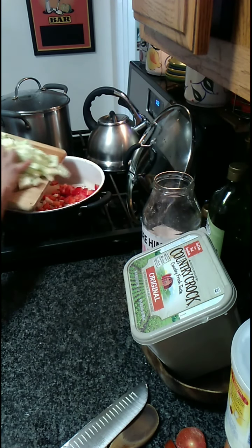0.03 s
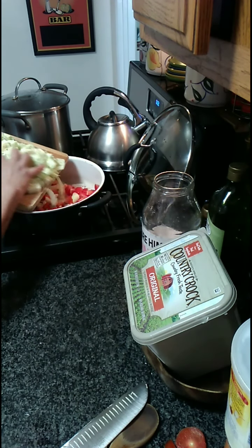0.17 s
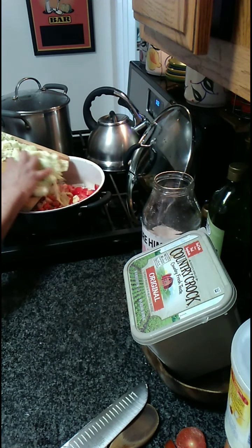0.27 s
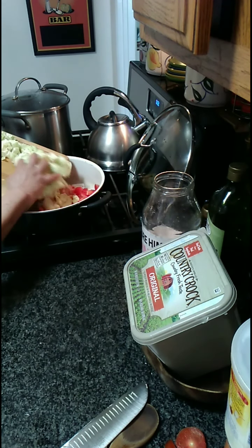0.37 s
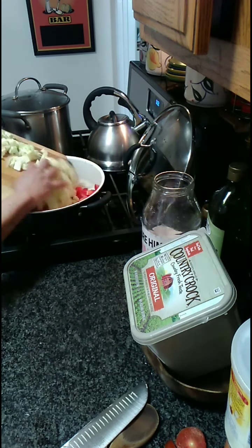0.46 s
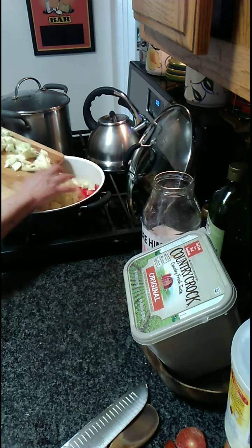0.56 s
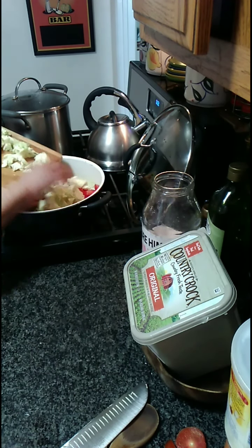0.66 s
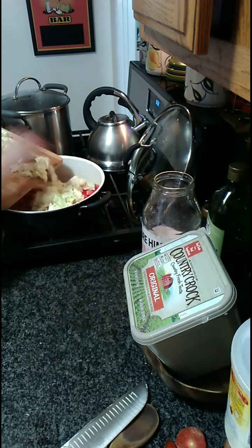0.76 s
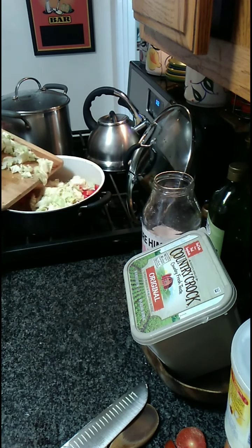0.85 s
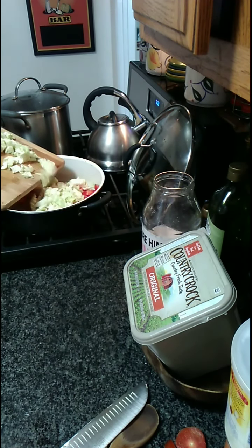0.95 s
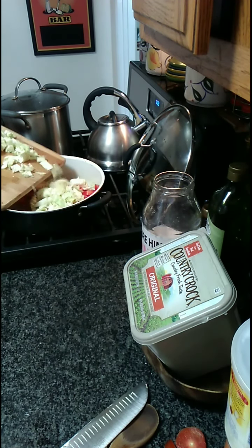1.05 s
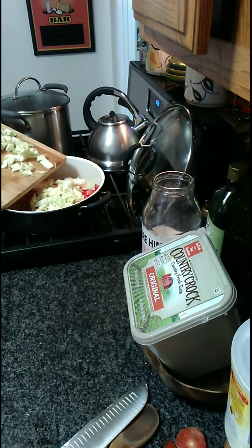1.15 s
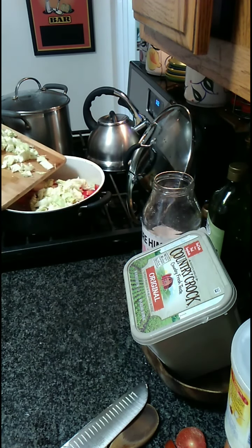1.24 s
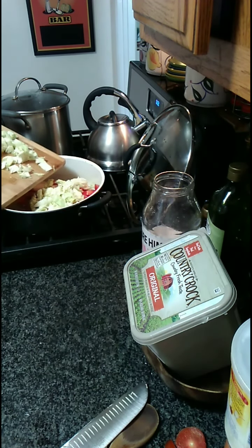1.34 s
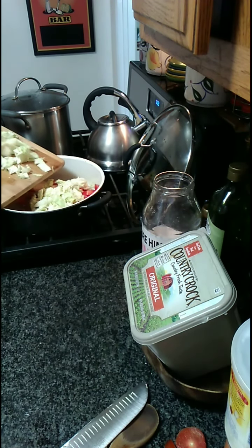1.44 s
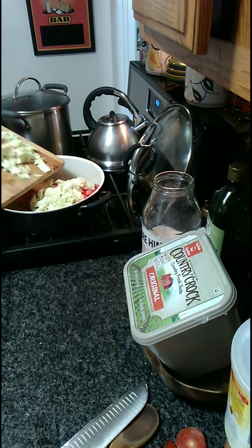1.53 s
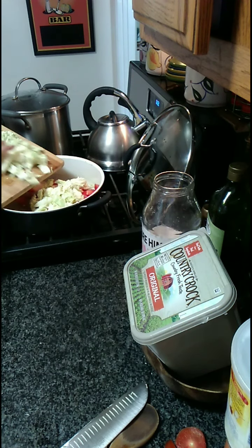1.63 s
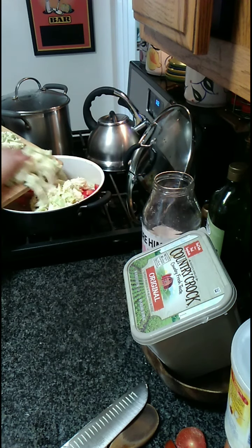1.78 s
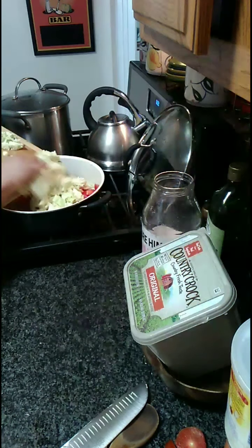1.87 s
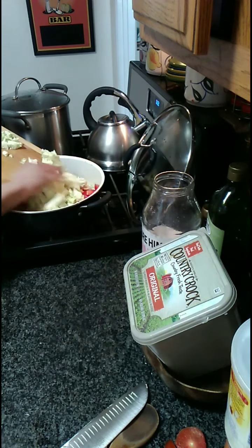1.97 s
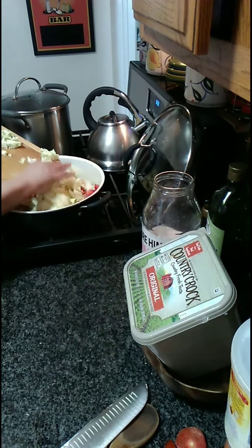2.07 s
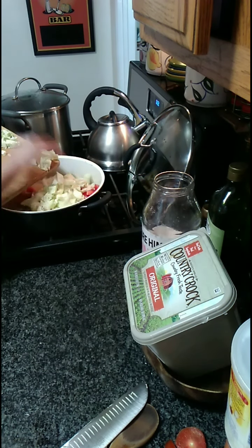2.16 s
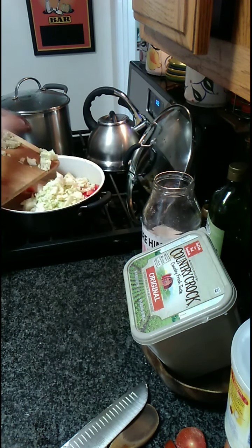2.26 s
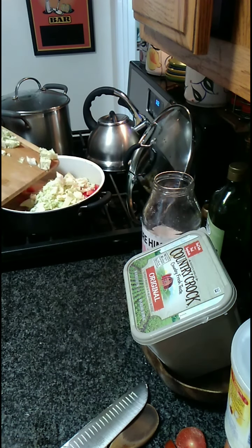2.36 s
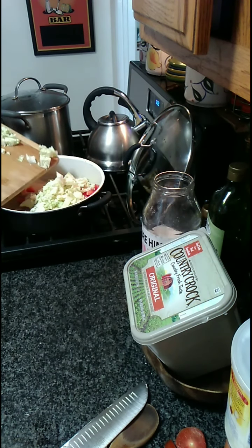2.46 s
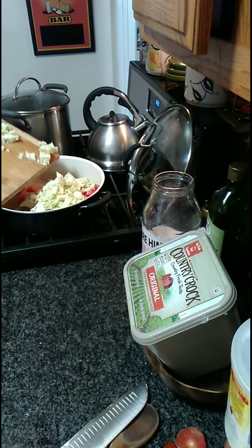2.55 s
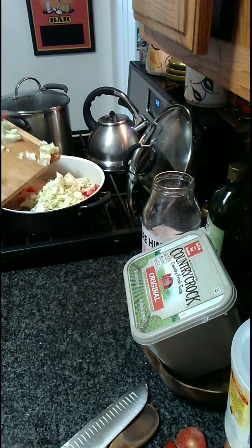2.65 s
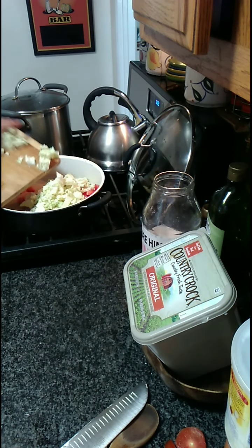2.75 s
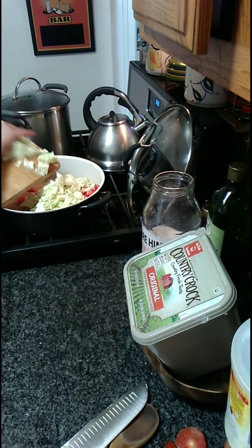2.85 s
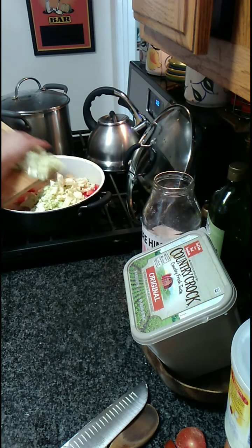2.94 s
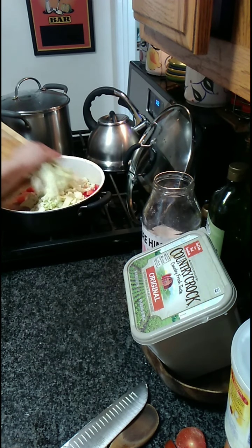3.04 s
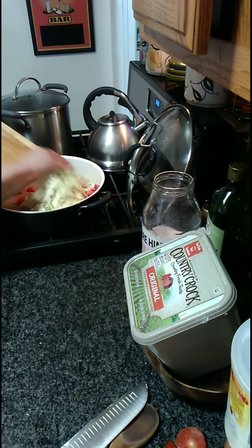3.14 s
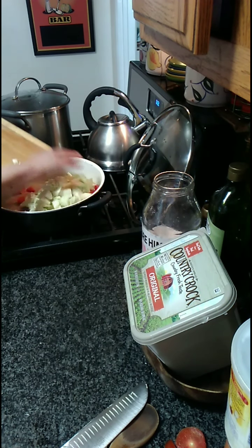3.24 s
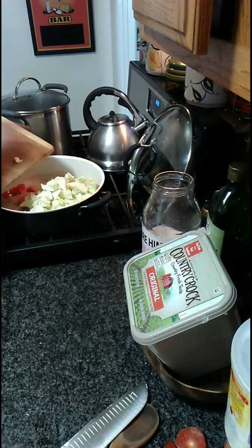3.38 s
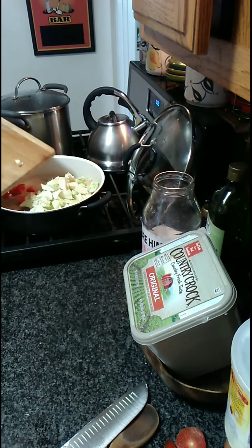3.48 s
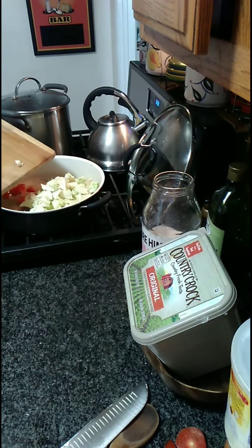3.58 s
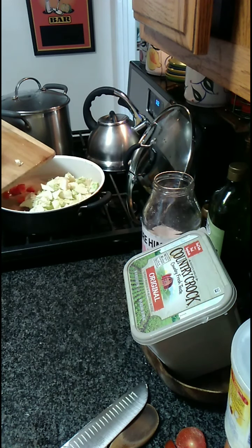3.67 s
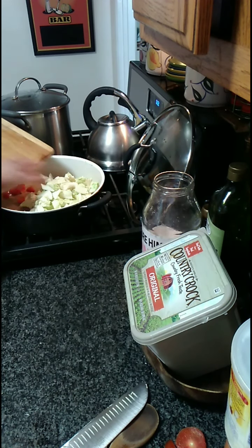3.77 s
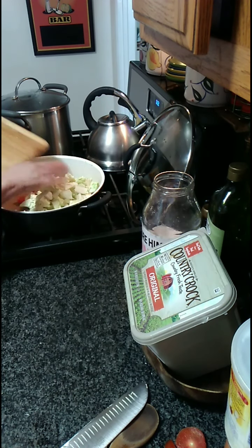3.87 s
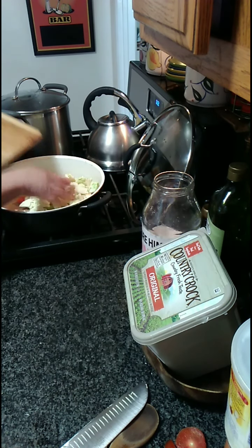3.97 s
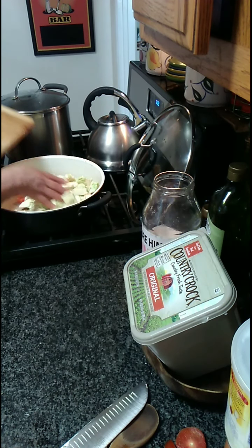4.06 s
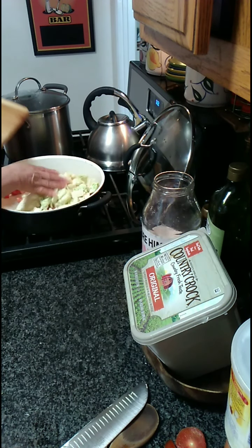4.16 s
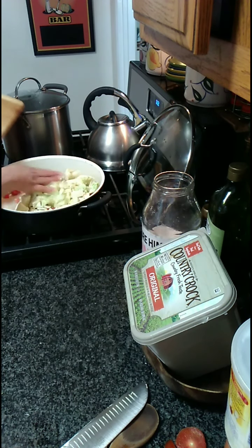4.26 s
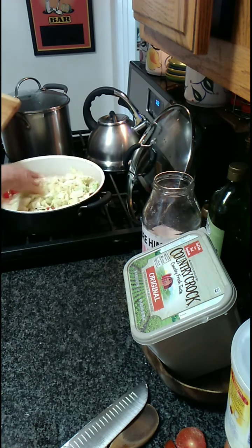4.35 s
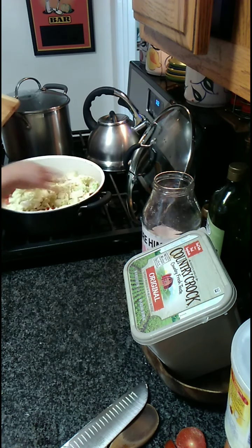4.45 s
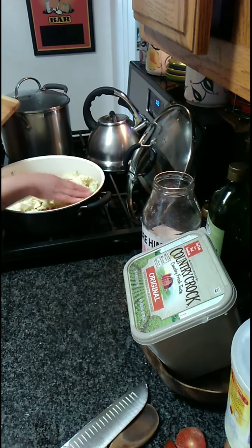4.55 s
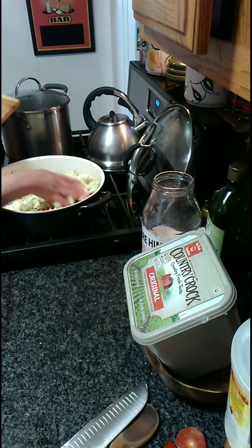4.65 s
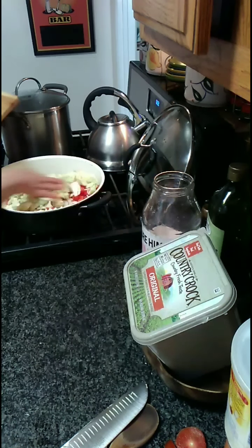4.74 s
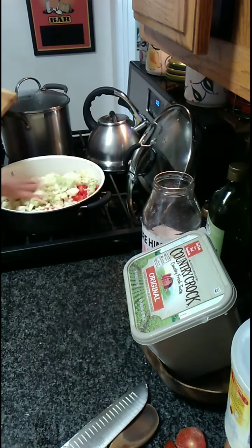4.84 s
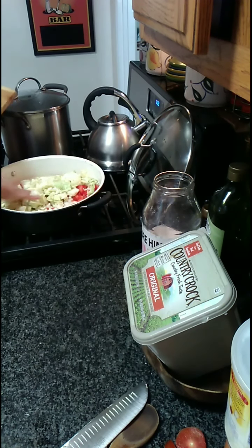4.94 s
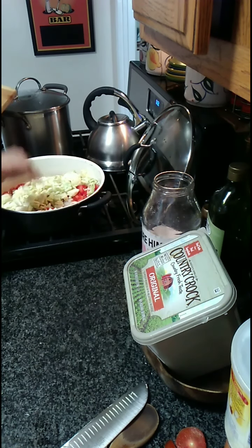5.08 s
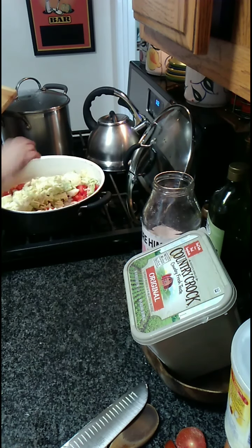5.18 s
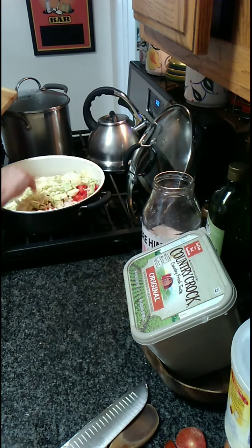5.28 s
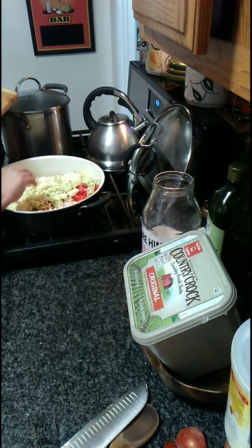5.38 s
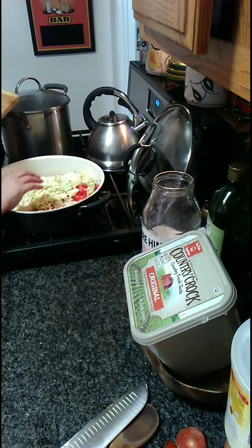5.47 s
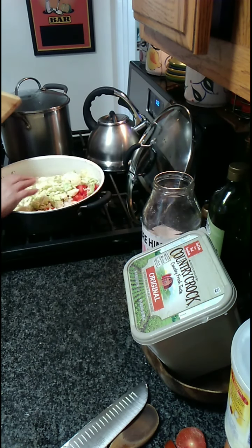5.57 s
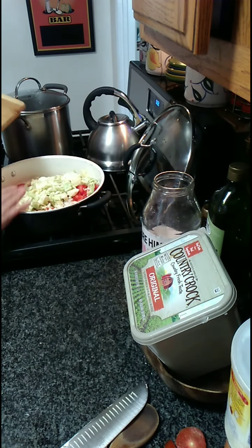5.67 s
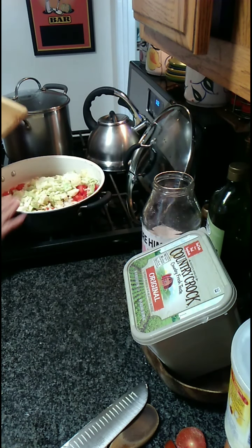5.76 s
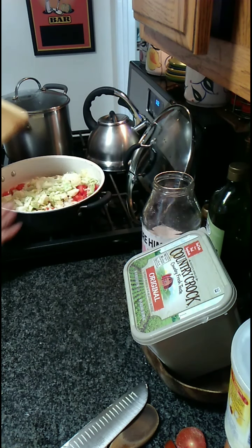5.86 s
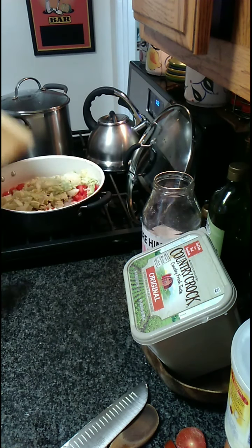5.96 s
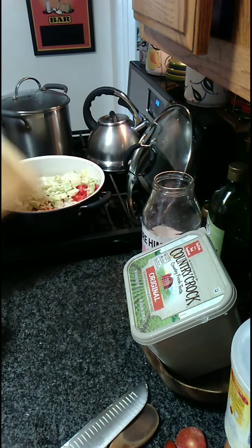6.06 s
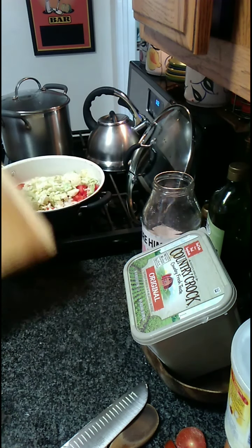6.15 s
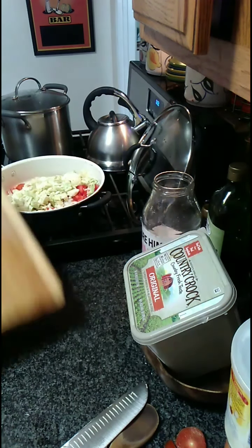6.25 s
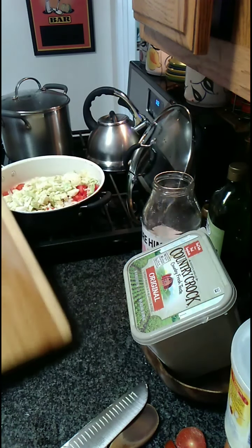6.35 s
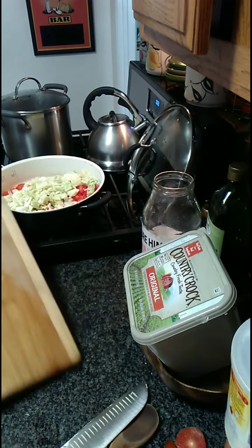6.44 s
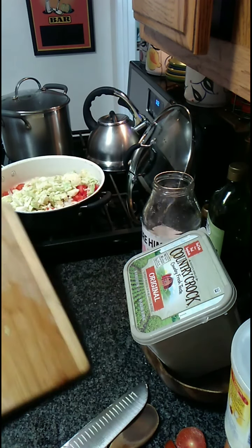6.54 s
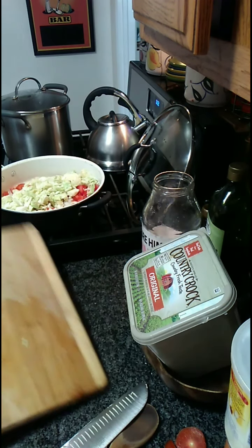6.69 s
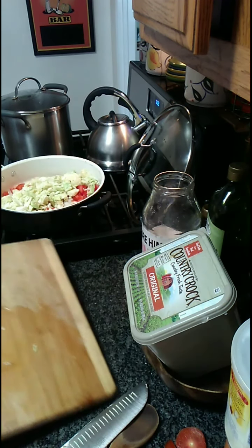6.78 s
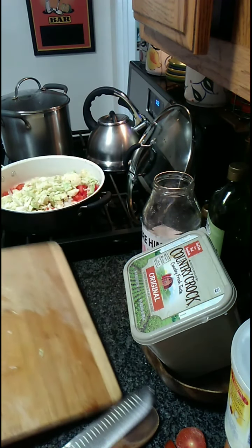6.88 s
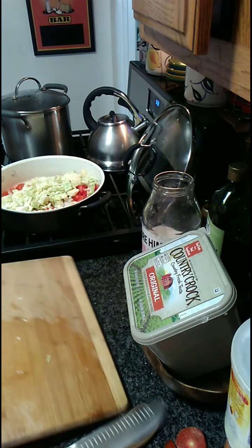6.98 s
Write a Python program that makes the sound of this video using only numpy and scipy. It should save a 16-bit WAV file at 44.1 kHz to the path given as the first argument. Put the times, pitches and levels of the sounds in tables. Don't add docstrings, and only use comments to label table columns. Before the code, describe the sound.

Brief leafy scrapes and dull plops of vegetables landing in a skillet, over faint, gated fat hiss. The pan knocks on the stove, and its rim is struck sharply later on. A distant caged bird gives falling slurs, peeps and husky whistles with room echo. Finally a wooden board slams onto the counter with several fast rebounds. Close phone microphone, uneven stereo, grip bumps.

```python
import sys
import numpy as np
from scipy import signal
from scipy.fft import rfft, irfft, next_fast_len
from scipy.io import wavfile
from scipy.ndimage import uniform_filter1d

SR = 44100
rng = np.random.default_rng(int(sys.argv[2]) if len(sys.argv) > 2 else 0)


def field_ratio(decibels):
    return 10 ** (np.asarray(decibels, dtype=float) / 20)


def int16_out(signal):
    q = np.round(np.clip(np.atleast_2d(signal).T, -1, 1) * 32767)
    wavfile.write(sys.argv[1], SR, q.astype(np.int16))


N = 309405

# [f/Hz, density/dB]
TUMBLE_COLOUR = [(220, -72), (320, -20), (430, 5.5), (670, 2), (880, 0.5), (1400, -25.5), (2500, -106)]
SCRAPE_COLOUR = [(470, -70), (800, -8.5), (1200, -6.5), (1300, -11), (1750, -3), (3500, -14), (4550, -45),
                 (7700, -120)]
HISS_COLOUR = [(1700, -24.5), (2200, -20), (2730, -19.5), (3100, -19), (4900, -17), (5500, -12.5),
               (8500, -33.5), (11000, -61.5)]
SIZZLE_COLOUR = [(4120, -27.5), (7000, -11), (8360, -13.5), (9550, -11), (11500, -1), (14900, -13.5),
                 (15600, -17.5)]
RUMBLE_COLOUR = [(18, -32), (40, -5), (70, -2), (100, -6.5), (140, 4.5), (200, -4.5), (260, -16.5),
                 (400, -14), (600, -71)]
FLOOR_COLOUR = [(150, -38), (250, 5), (1640, -68), (1990, 9.5), (4320, -31), (5690, 21), (6650, -33.5),
                (11400, -9.5), (15500, -34.5)]
GRIP_COLOUR = [(20, -8), (40, 0), (65, 3), (100, -14), (200, -60)]
# [f/Hz, density/dB]
CLACK_COLOUR = [(530, 0), (900, 0), (1030, -3), (1920, 2.5), (2160, 2), (2630, -1.5), (3070, -1.5),
                (4760, -8), (7000, -23.5), (9100, -41.5), (15400, -120)]
EDGE_COLOUR = [(2940, -38.5), (5000, -4.5), (6590, -9), (7180, -14), (8240, -19.5), (11800, -12.5),
               (15600, -37.5)]

# [t/s, hold/s, tumble/dB, scrape/dB, rumble/dB]
PUSHES = [(0, 0.092, -56.5, -51, -59.5), (0.222, 0.13, -53, -54, -60.5), (0.45, 0.26, -97, -73, -61.5),
          (0.393, 0.071, -88, -88, -61), (0.794, .25, -77, -88, -63), (1.07, 0.4, -75.5, -56.5, -58),
          (1.535, 0.32, -59, -52.5, -67), (1.837, 0.15, -47.5, -47, -73), (2.595, 0.06, -45.5, -51, -55.5),
          (2.74, 0.35, -75, -58.5, -66), (3.485, 0.1, -80, -70, -72.5), (3.895, 0.074, -73.5, -81, -65),
          (4.052, 0.11, -63, -50, -64), (4.443, 0.39, -63, -56.5, -79.5), (4.86, 0.096, -47.5, -49, -51),
          (5.723, 0.025, -54, -70, -67.5), (6.397, 0.12, -86, -55, -64)]
# [t/s, hold/s, level/dB]
GRIP_SHIFTS = [(0, 0.092, -70), (.3, .2, -61.5), (.88, .05, -75), (1.03, .14, -60), (1.4, .05, -74),
               (1.68, .04, -79), (2.14, .05, -69), (4.3, .1, -78), (5.2, 0.12, -68), (5.55, .2, -74),
               (6.424, .06, -64)]

# [t of last fall/s, falls, level/dB, step/s, hurry/s]
PHRASES = [
    (.893, 6, -42, .2, .004),
    (5.22, 7, -42.5, .188, .001),
]
# [length/s, start f/Hz, end f/Hz]
FALL = (.115, 5230, 2450)
# [t after last fall/s, length/s, start f/Hz, end f/Hz, level/dB]
RISES = [
    (.275, .025, 3380, 3480, -12),
    (.297, 0.043, 3927, 3940, -2),
    (.335, .05, 4000, 4420, -7),
    (0.379, 0.15, 4176, 4210, -4.5),
]
# [t/s, length/s, start f/Hz, end f/Hz, level/dB]
SLURS = [
    (2.724, 0.11, 1660, 1692, -53.5),
    (3.408, 0.32, 4780, 2450, -51.5),
    (3.785, 0.26, 5790, 2400, -45.5),
    (3.446, 0.17, 1998, 1814, -60),
    (3.777, 0.11, 1770, 1900, -75),
    (5.939, 0.066, 1787, 1910, -63),
    (6.127, 0.09, 1814, 1860, -60.5),
]
# [t/s, length/s, f/Hz, level/dB]
WHISTLE_NOTES = [(2.412, 0.087, 5896, -49.5), (2.546, 0.071, 5880, -43), (2.7, 0.087, 5855, -45.5),
                 (2.859, 0.065, 5630, -46.5), (3.012, 0.047, 5700, -44), (3.063, 0.036, 5670, -49),
                 (3.13, 0.042, 5700, -53), (3.16, 0.081, 5676, -47.5), (3.195, 0.078, 5830, -51.5)]
# [f/Hz, t60/s]
ROOM_T60 = [(300, 0.59), (3000, 0.4), (10000, 0.6)]

# [t/s, length/s, first level/dB, last level/dB, hiss over sizzle/dB]
OPENINGS = [(0.046, 0.13, -42, -60.5, -5), (0.186, 0.26, -53.5, -48, -11.5),
            (0.369, 0.24, -59.5, -53.5, -6.5), (.63, 0.27, -60.5, -65, -39), (0.853, 0.23, -58.5, -48, -17),
            (1.113, 0.32, -45.5, -53.5, -7), (1.44, 0.37, -54, -47, -9.5), (1.816, 0.32, -48, -62, -10),
            (2.191, 0.042, -74.5, -78, 8.5), (2.438, 0.46, -56.5, -47.5, -11),
            (2.937, 0.32, -41.5, -64.5, -13.5), (3.476, 0.11, -50, -52.5, -10),
            (3.869, 0.28, -44.5, -32, -14), (4.197, 0.13, -53, -59, -5.5), (4.348, 0.31, -49.5, -40, -11),
            (4.735, 0.14, -36, -68, -5), (4.89, 0.27, -56, -71, -11.5), (5.301, 0.27, -52, -61.5, -10),
            (5.646, 0.24, -61, -58.5, -10), (5.977, 0.24, -60, -82, -10.5), (6.264, 0.16, -74.5, -56, -4),
            (6.41, 0.11, -64, -64, 0.5), (6.637, 0.18, -51, -62.5, -4), (6.814, 0.31, -63, -58, 15)]
# [f/Hz, width/Hz]
MUTE_PRONE = [(2530, 70), (3330, 170), (6700, 260)]

# [f/Hz, width/Hz, level/dB]
PAN_MODES = [
    [(300, 65, -14), (447, 70, -1.5)],
    [(960, 73, 2.5), (1118, 160, -3)],
    [(1580, 250, -2), (1880, 120, 16.5), (2670, 144, 0), (4150, 210, 6)],
]
RIM_MODES = [
    [(328, 156, -22.5), (458, 70, -3), (600, 87, -1.5)],
    [(1290, 157, 0.78), (1525, 315, 1), (1670, 153, 4.5)],
    [(1900, 170, -15), (2740, 200, -2), (3250, 85, -3), (3840, 460, 2.5)],
]
BOARD_MODES = [
    [(337.6, 107, 3.5), (550, 100, -4.5)],
    [(698, 120, -3), (836.5, 45, 12), (950, 292, 11), (1040, 183, 16), (1184, 37, 3.5)],
    [(1360, 310, -2), (1477, 42, 5.5), (2340, 570, -11), (2450, 81, -17)],
]
# [t/s, peak level/dB, deep/dB, edge/dB, t60/s]
PAN_KNOCKS = [(0.0483, -31, -38, -6, 0.13), (0.5992, -31.5, -9, -27, 0.54), (1.0594, -92, -26, -3, 0.73),
              (1.8101, -23.5, -8, -5, 0.38), (1.878, -32, -0.5, -17, 0.48), (1.909, -33, -1.5, -14, .1),
              (1.9668, -33, -6.5, -5, 0.28), (2.174, -38, -21, -7.5, 0.13), (2.5539, -34.5, 2.5, -5.5, 1),
              (2.585, -44.5, 11.5, -16, 1), (2.597, -37, 4, -20, 0.095), (2.619, -47, 4, -16, 0.077),
              (4.7892, -15.5, -4.5, -8.5, 0.31), (4.898, -25.5, -18, -7, 0.19),
              (4.9715, -27, -4.5, -8, 0.32), (5.057, -36, -4.5, -29, 0.31), (5.6341, -22.5, -16, -9, 0.31),
              (5.7266, -30, -10, -7.5, 0.55), (5.784, -34.5, -6, -16.5, 0.32),
              (5.8642, -35.5, -29, -26, 0.14)]
RIM_KNOCKS = [(1.442, -44, -19, -9, .15), (1.54, -43, 3, -10, 0.1), (1.583, -33, -13, -29, 0.33),
              (2.098, -54, -10, -24, 0.22), (4.381, -38, -5, 12.5, 0.34), (4.3867, -36.5, -7, 12.5, 0.4),
              (4.7471, -13, -5.5, -3.5, 0.18), (4.764, -30, -3, -12, 0.19),
              (5.2668, -18, -10.5, -3.5, 0.52), (5.285, -30.5, -2, -19, 0.13),
              (5.354, -25.5, -7, -9, 0.085), (5.3171, -18.5, -2, -3.5, 0.12), (5.3344, -26.5, 2, -7, 0.12),
              (5.371, -32, 3.5, -26, 0.46)]
BOARD_SLAMS = [
    (6.2534, -34.5, 12, -38, 0.27),
    (6.287, -41.5, -7.5, -41, 0.72),
    (6.598, -10.5, 1.5, -15, 0.43),
    (6.6261, -12, -25, -31, 0.22),
    (6.789, 2, -17.5, -17, 0.48),
    (6.8192, 0, -14.5, -18.5, 0.29),
    (6.8546, -1, -40, -30, 0.27),
    (6.8843, -8.5, -37, -17.5, 0.36),
]
# [t/s, peak level/dB, f/Hz, overtone/dB]
THUDS = [(0.201, -38, 583, -1), (0.35, -36.5, 600, -3), (0.427, -42.5, 593, -25), (0.542, -40.5, 642, -54),
         (0.586, -36.5, 460, -27), (0.651, -46.5, 406, 21), (0.856, -46.5, 653, -19),
         (1.104, -51.5, 446, 5), (1.189, -43, 473, 9.5), (1.364, -31.5, 585, 5), (1.44, -34.5, 575, 9.5),
         (1.591, -25.5, 595, 10.5), (1.66, -31, 584, 9), (1.76, -33.5, 620, 3), (2.103, -38, 627, 11),
         (2.436, -57.5, 700, -15), (2.515, -43, 428, 10), (2.903, -42, 440, 14.5), (3.03, -44, 582, -12),
         (3.111, -44, 579, -14), (3.949, -47, 600, -25), (4.066, -35.5, 813, -8), (4.117, -41, 670, 14),
         (4.387, -39, 582, 14), (4.668, -47, 583, -14), (5.636, -36, 443, 8.5), (4.9, -33, 334, -20),
         (5.04, -41, 312, -23), (5.27, -29, 603, -4), (5.727, -37, 355, 14.5), (2.565, -38, 820, -12),
         (2.625, -39, 753, -6), (2.7, -43, 797, -10), (4.69, -48, 940, -20), (1.139, -48, 1006, -20),
         (1.23, -46.5, 1000, -20), (1.964, -39, 1880, -30), (4.752, -26, 600, -30),
         (6.257, -27.5, 338, -27), (6.268, -27.5, 1022, -21), (6.3, -31, 350, -20),
         (6.602, -12.5, 956, -27.5), (6.631, -10.5, 1023, -7), (6.643, -14, 995, -20),
         (3.379, -64, 570, -22), (6.256, -26.5, 1312, -25), (6.44, -47, 2080, -30), (4.075, -47, 1007, -10),
         (4.1, -61, 533, -5), (4.45, -40.5, 560, -5), (3.62, -65, 770, -20), (3.83, -61, 774, -20),
         (3.999, -55, 422, -10), (4.972, -36, 950, -3),
         (1.538, -42.5, 1134, -5), (1.595, -42, 2500, -25), (1.61, -37, 1335, -20),
         (1.659, -36.5, 1246, -20), (1.809, -36.5, 2720, -25), (2.176, -49, 3205, -25),
         (2.47, -50, 1457, -20), (2.718, -41, 1056, -15), (2.901, -47, 1140, -20), (4.898, -46, 4230, -30),
         (4.9, -38, 990, -10), (4.97, -45, 4100, -30), (6.832, -9, 2210, -31), (6.852, -10, 2175, -30),
         (2.33, -71, 2060, -30), (2.6, -53, 340, -20), (2.9, -46, 592, -20), (2.9, -47, 870, -20),
         (4.062, -42, 603, -20), (4.17, -45, 898, -15), (4.3, -59.5, 516, -20), (4.465, -46, 825, -19.5),
         (5.36, -33, 1065, -20), (.89, -58.5, 1006, -20), (3.85, -65, 1260, -20), (5.637, -38, 1010, -5),
         (5.728, -35, 960, -10), (5.78, -41, 1023, -15), (6.632, -19, 2160, -30), (5.865, -52, 2500, -30)]
# [t/s, hold/s, level/dB]
RATTLE = [
    (6.793, 0.089, -19),
]
# [f/Hz, width/Hz, level/dB]
RATTLE_MODES = [(436, 38, -8.5), (560, 44, -4), (721, 91, 0), (805, 55, 3), (970, 40, -1.5)]

# [f/Hz, likeness 0..1]
LIKENESS = [(60, 0.9), (130, 1), (290, 0.84), (640, 0.75), (1400, 0.098), (5000, 0.14), (12000, .15)]
# [f/Hz, left minus right/dB]
LEFT_OVER_RIGHT = [(60, 2.5), (140, 8), (330, 4), (600, 11.5), (1200, 4), (2700, 2.5), (5500, -1.5),
                   (8000, 8), (10000, 38), (15000, 64)]


def unit(x):
    return x / np.sqrt(np.mean(x ** 2) + 1e-20)


def along(points, hz):
    f, v = np.transpose(points)
    return np.interp(np.log(hz + 1), np.log(f + 1), v)


def curves(rows, rise_db_s, fall_db_s, rest_db):
    t = np.arange(N) / SR
    spells = []
    for s, length, first, last in rows:
        times = [s - 1, s, s + length, s + length + 1]
        spells.append(np.interp(t, times, [first - rise_db_s, first, last, last - fall_db_s]))
    return np.maximum(np.max(spells, axis=0), rest_db)


def holds(rows, rise_db_s, fall_db_s, rest_db):
    return curves([(s, hold, db, db) for s, hold, db in rows], rise_db_s, fall_db_s, rest_db)


def filtered(x, response):
    m = next_fast_len(N + SR // 2)
    return irfft(rfft(x, m) * response(np.fft.rfftfreq(m, 1 / SR)), m)[..., :N]


def unit_gain(response):
    return lambda f: response(f) / np.sqrt(np.mean(np.abs(response(f)) ** 2))


def modes(rows):
    def response(f):
        total = 0
        for k, (c, w, db) in enumerate(rows):
            total = total + (-1) ** k * field_ratio(db / 2) * 1j * f * w / (c * c - f * f + 1j * f * w)
        return total ** 2
    return unit_gain(response)


def colour(spectrum):
    return unit_gain(lambda f: field_ratio(along(spectrum, f)) * np.minimum(f / spectrum[0][0], 1) ** 4)


def rush(spectrum, patchy_db, grain_db, size=(5, 8)):
    grain = rng.standard_normal(N // 64 + 1).repeat(64)[:N]
    white = rng.standard_normal((2, N)) * field_ratio(grain_db * grain)
    z = signal.stft(white, nperseg=512)[2]
    field = uniform_filter1d(rng.standard_normal(z.shape[1:]), size[0], 0)
    field = uniform_filter1d(field, size[1], 1)
    pair = signal.istft(z * field_ratio(patchy_db * unit(field)), nperseg=512)[1][:, :N]
    return unit(filtered(pair, colour(spectrum)))


def empty_bus(*shape):
    return np.zeros((*shape, N + 3 * SR))


def add(bus, s, x):
    i = round(s * SR) + SR
    bus[..., i:i + x.shape[-1]] += x


def noise_floor():
    return field_ratio(-82) * rush(FLOOR_COLOUR, patchy_db=3.0, grain_db=4.0, size=(2, 22))


def cabbage():
    house_db, still_db = -69, -90

    def push(column, rest_db):
        rows = [(r[0], r[1], r[column]) for r in PUSHES]
        return holds(rows, rise_db_s=182, fall_db_s=112.5, rest_db=rest_db)

    blows = PAN_KNOCKS + RIM_KNOCKS + BOARD_SLAMS
    shakes = [(s + 0.038, .02, db + deep_db - 22) for s, db, deep_db, *_ in blows]
    shake_db = holds(shakes, rise_db_s=574.5, fall_db_s=122, rest_db=house_db)
    rumble_db = np.maximum(push(4, house_db), shake_db)
    tumble = rush(TUMBLE_COLOUR, patchy_db=3.5, grain_db=2.5, size=(2, 16))
    scrape = rush(SCRAPE_COLOUR, patchy_db=3.2, grain_db=2.5, size=(2, 16))
    rumble = rush(RUMBLE_COLOUR, patchy_db=2.5, grain_db=3.5)
    leaves = field_ratio(push(2, still_db) - 1.0) * tumble + field_ratio(push(3, still_db) - 4.0) * scrape
    return leaves + field_ratio(rumble_db - 3.5) * rumble


def handling():
    level_db = holds(GRIP_SHIFTS, rise_db_s=200, fall_db_s=150, rest_db=-90)
    return field_ratio(level_db) * rush(GRIP_COLOUR, patchy_db=-1.5, grain_db=0.0)


def room(x, hz, direct):
    t = np.arange(SR // 2) / SR
    tail = rng.standard_normal((2, len(t))) * field_ratio(-60 * t / along(ROOM_T60, hz))
    return signal.fftconvolve(x[None], tail / np.linalg.norm(tail[0]) + direct * (t == 0), axes=1)


def slur(length, start_hz, end_hz):
    u = np.arange(round(length * SR)) / (length * SR)
    bend = 3.3 if length > .18 and start_hz > end_hz + 500 else 1
    if end_hz > start_hz:
        rough_hz = .034 * end_hz * (length > .044) * (end_hz > 3000)
    else:
        rough_hz = .052 / bend * (start_hz - end_hz)
    hoarse_hz = (30 + rough_hz) * rng.standard_normal(len(u) // 90 + 1)
    hoarse_hz = uniform_filter1d(hoarse_hz.repeat(90), size=60)[:len(u)]
    hz = end_hz + (start_hz - end_hz) * (1 - u) ** bend + hoarse_hz
    swell = np.sin(np.pi * u ** .55) ** (0.6 * bend ** .5)
    flutter = rng.standard_normal(len(u) // 120 + 1).repeat(120)[:len(u)]
    return swell * np.sin(2 * np.pi * np.cumsum(hz) / SR) * (1 + .3 * (start_hz > 3000) * flutter)


def two_voiced(length, note_hz):
    u = np.arange(round(length * SR)) / (length * SR)
    hoarse_hz = 18 * rng.standard_normal(SR // 130).repeat(130)[:len(u)]
    husky = 1 + .5 * rng.standard_normal(SR // 260).repeat(260)[:len(u)]
    scoop_hz = 149 * (1 - u) ** 3
    turn = 2 * np.pi * np.cumsum(note_hz - scoop_hz + hoarse_hz) / SR
    return np.sin(np.pi * u) * (np.sin(turn) + field_ratio(-8) * husky * np.sin(turn / 2))


def bird():
    song, whistle = empty_bus(2), empty_bus(2)
    notes = list(SLURS)
    for s, count, db, step, hurry in PHRASES:
        notes += [(s - k * step + k * k * hurry, *FALL, db) for k in range(round(count))]
        notes += [(s + after, *glide, db + rise_db) for after, *glide, rise_db in RISES]
    for s, length, start_hz, end_hz, db in notes:
        add(song, s, field_ratio(db) * room(slur(length, start_hz, end_hz), start_hz, direct=0.17))
    for s, length, note_hz, db in WHISTLE_NOTES:
        add(whistle, s, field_ratio(db) * room(two_voiced(length, note_hz), note_hz, direct=0.66))
    song = signal.sosfiltfilt(signal.butter(12, 5500, fs=SR, output='sos'), song)
    return song[:, SR:SR + N], 0.83 * whistle[:, SR:SR + N]


def suppressor():
    open_db_s, shut_db_s, shut_db = 408.5, 261, -91
    sizzle = [(s, length, first, last) for s, length, first, last, _ in OPENINGS]
    hiss = [(s, length, first + over, last + over) for s, length, first, last, over in OPENINGS]
    sizzle_db = curves(sizzle, open_db_s, shut_db_s, shut_db)
    return sizzle_db, curves(hiss, 0.86 * open_db_s, 0.77 * shut_db_s, shut_db + 5)


def frying():
    sizzle_db, hiss_db = suppressor()
    sizzle = rush(SIZZLE_COLOUR, patchy_db=1.8, grain_db=2.5, size=(2, 4))
    hiss = rush(HISS_COLOUR, patchy_db=2, grain_db=2, size=(3, 16))
    return field_ratio(np.minimum(sizzle_db, -47) - 0.53) * sizzle + field_ratio(np.minimum(hiss_db, -57) + 5.5) * hiss


def dropouts(x):
    hz, t, z = signal.stft(x, SR, nperseg=512)
    bands = np.round(18 * np.log(hz + 1)).astype(int)
    draws = uniform_filter1d(rng.standard_normal((bands[-1] + 1, len(t) // 4 + 1)), 4, 1)
    chance = unit(draws).repeat(4, 1)[bands, :len(t)]
    chance = chance + sum(np.exp(-((hz[:, None] - c) / w) ** 2) for c, w in MUTE_PRONE)
    sizzle_db, hiss_db = (np.interp(t, np.arange(N) / SR, db) for db in suppressor())
    shutting = np.clip((-64 - hiss_db) / 7, 0, 3) * np.clip((sizzle_db + 90) / 14, .25, 1)
    treble = np.clip((hz[:, None] - 2500) / 2800, 0, 1)
    weak = uniform_filter1d(np.abs(z).max(0), size=5, axis=1) < field_ratio(-68)
    spared = (abs(hz[:, None] - 10900) <= 2600) | (hz[:, None] <= 300)
    muted = weak & (chance > 1.7 - shutting * treble) & ~spared
    return signal.istft(z * np.where(muted, field_ratio(-40), 1), SR, nperseg=512)[1][:, :N]


def knocks(events, body, ring_db, wood_db, follows):
    buses, t = empty_bus(4, 2), np.arange(SR * 2 // 3) / SR
    for s, db, deep_db, edge_db, t60 in events:
        skip_db = -8.5 * np.clip((edge_db + 5.5) / 4, 0, 1)
        woody_db = wood_db + follows * deep_db + skip_db
        lumps = field_ratio(1.07 * rng.standard_normal(len(t) // 150 + 1).repeat(150)[:len(t)])
        tail = lumps * field_ratio(-60 * np.maximum(t - .02, 0) / t60) * rng.standard_normal((2, len(t)))
        blow = tail + 2.25 * field_ratio(-60 * t / 0.015) * rng.standard_normal(len(t))
        if edge_db < -33:
            blow = 3 * signal.lfilter(*signal.butter(2, 2200 / (SR / 2)), blow)
        group_db = db - 17.5 + np.array([deep_db, woody_db, 0, edge_db])
        add(buses, s, field_ratio(group_db)[:, None, None] * blow)
    deep, woody, clinking = body

    def tones(f):
        clack = colour(CLACK_COLOUR)(f) + field_ratio(ring_db) * modes(clinking)(f)
        return np.array([modes(deep)(f), modes(woody)(f), clack, colour(EDGE_COLOUR)(f)])[:, None]

    return filtered(buses[..., SR:SR + N], tones).sum(0)


def twice_resonant(hz, width_hz, x):
    return signal.sosfilt([np.concatenate(signal.iirpeak(hz, hz / width_hz, SR))] * 2, x)


def thuds():
    bus, t = empty_bus(2), np.arange(SR // 2) / SR
    contact = np.minimum(t / 0.029, 1)
    for s, db, hz, overtone_db in THUDS:
        t60 = 0.33 * np.exp(-1.4 * max(db + 26, 0))
        decay = field_ratio(-60 * t / t60)
        noise = (1 - np.exp(-t / 0.0004)) * rng.standard_normal((2, len(t)))
        bonk = field_ratio(-5) * np.sin(np.pi * contact ** 0.6) ** 2 * np.sin(2 * np.pi * hz * t)
        ring = field_ratio(14.5) * twice_resonant(hz, 134, noise * decay * contact)
        tick = noise * (1.5 * field_ratio(-60 * t / 0.0041) + decay)
        add(bus, s - .003, field_ratio(db) * (bonk * np.array([[1], [0]]) + ring))
        add(bus, s, field_ratio(db + overtone_db - 7.5) * twice_resonant(2.12 * hz, 430, tick))
    return bus[:, SR:SR + N]


def rattle():
    level_db = holds(RATTLE, rise_db_s=3000, fall_db_s=190, rest_db=-200)
    return field_ratio(level_db) * filtered(rng.standard_normal((2, N)), modes(RATTLE_MODES))


def scene():
    pan = knocks(PAN_KNOCKS, PAN_MODES, ring_db=-14, wood_db=-1.5, follows=0.32)
    rim = knocks(RIM_KNOCKS, RIM_MODES, ring_db=-9.5, wood_db=3, follows=0.2)
    board = knocks(BOARD_SLAMS, BOARD_MODES, ring_db=-10.5, wood_db=4.0, follows=0.46)
    steady = noise_floor() + cabbage() + handling() + frying()
    near = dropouts(steady + pan + rim + board + thuds() + rattle())
    ducking = field_ratio(0.11 * np.minimum(suppressor()[0] + 62, 0))
    song, whistle = bird()
    return near + ducking * (song + whistle)


def microphones(f):
    turn = np.arccos(np.clip(along(LIKENESS, f), 0, 1)) / 2
    lag_s = 0.00102
    right = -field_ratio(-along(LEFT_OVER_RIGHT, f)) * np.exp(2j * np.pi * lag_s * np.maximum(f - 350, 0))
    w = np.array([[np.cos(turn), np.sin(turn)], [right * np.cos(turn), -right * np.sin(turn)]])
    return w / np.sqrt((np.abs(w.mean(0)) ** 2).sum(0))


def roll_off(x):
    return signal.sosfilt(signal.butter(12, 15720, fs=SR, output="sos"), x)


def record(dry):
    x = filtered(dry[None], lambda f: microphones(f) * f ** 2 / (f ** 2 + 45 ** 2)).sum(1)
    x = x / (1 + np.abs(x / .92) ** 4) ** (1 / 4)
    mix = filtered(x, lambda f: f < 15600)
    return roll_off(mix)


dry = scene()
out = record(dry)
int16_out(out)
```